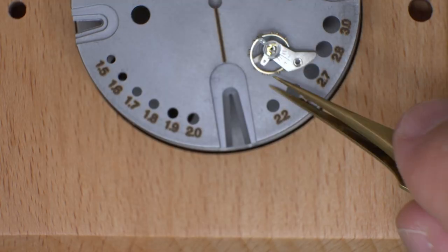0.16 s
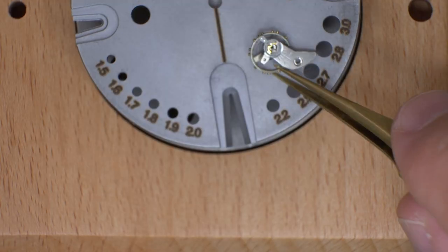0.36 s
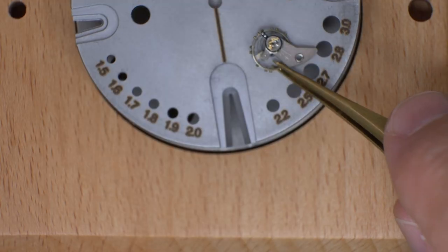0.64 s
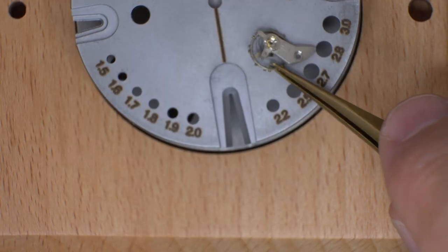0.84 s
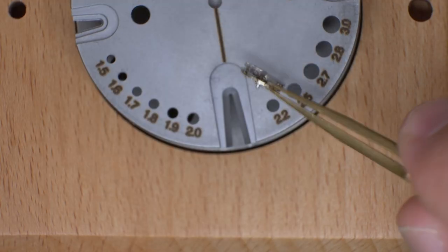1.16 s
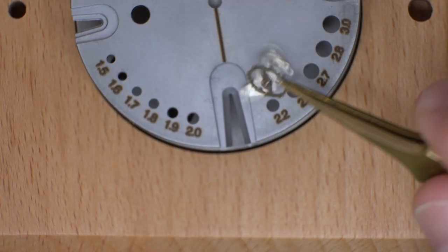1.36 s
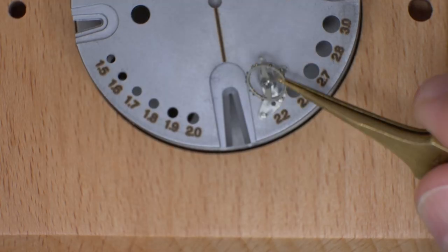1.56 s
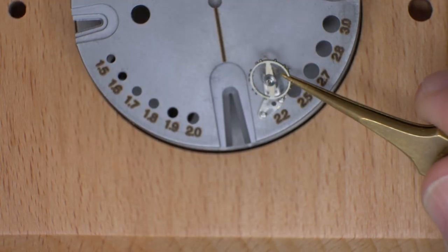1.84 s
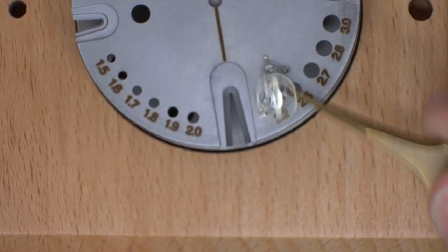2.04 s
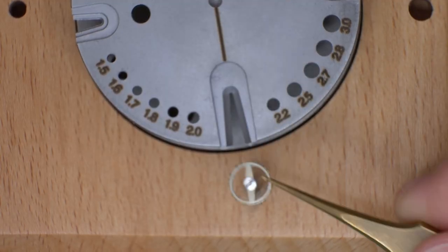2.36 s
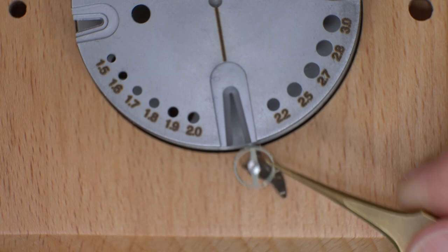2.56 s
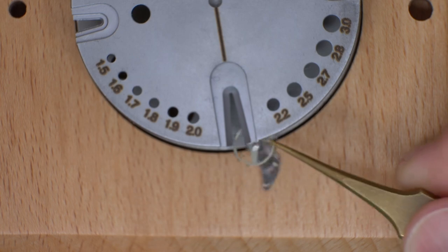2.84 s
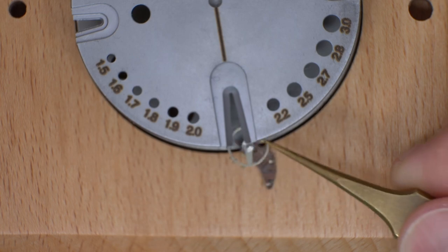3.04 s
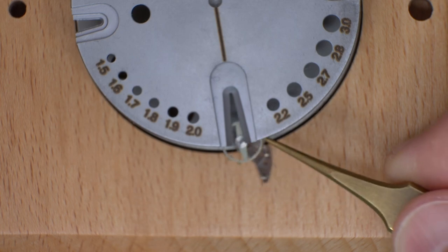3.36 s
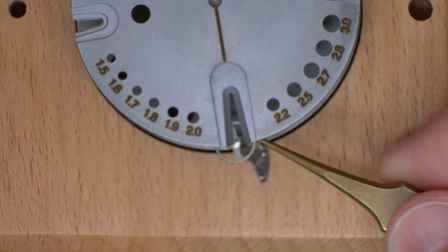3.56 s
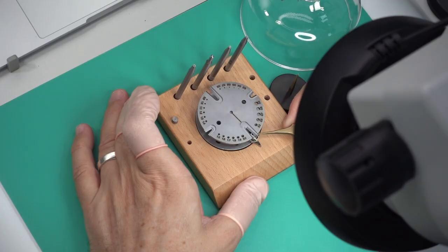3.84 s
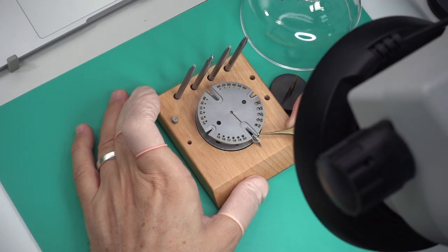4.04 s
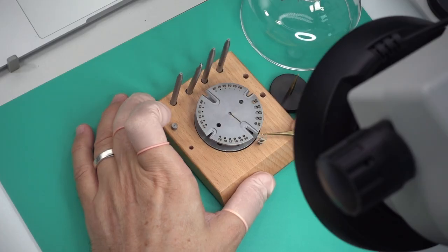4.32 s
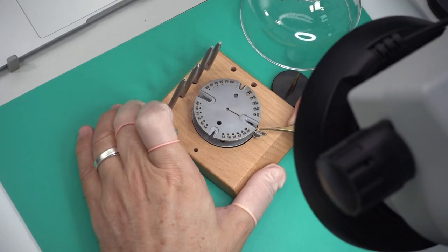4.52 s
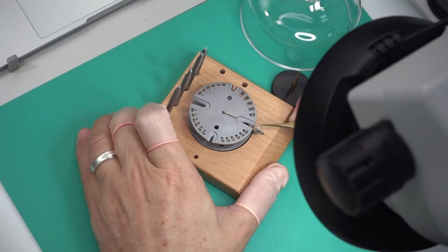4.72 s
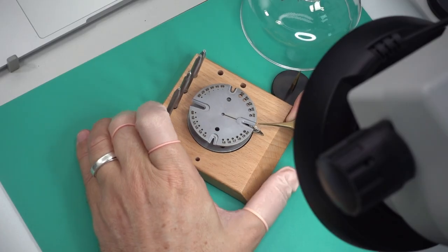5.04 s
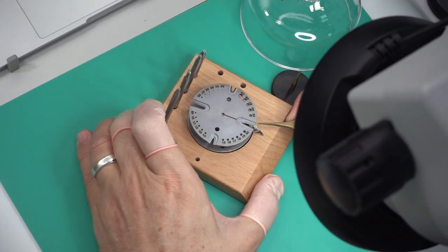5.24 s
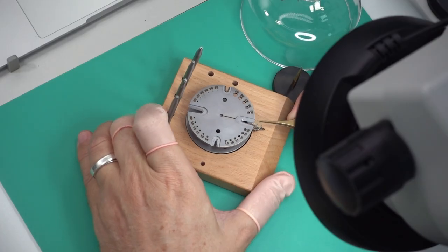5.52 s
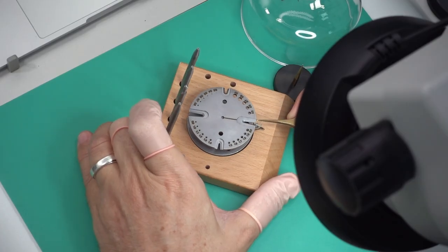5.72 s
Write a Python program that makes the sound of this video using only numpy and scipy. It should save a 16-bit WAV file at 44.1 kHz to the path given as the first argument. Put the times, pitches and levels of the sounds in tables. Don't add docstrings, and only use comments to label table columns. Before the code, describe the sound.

In a quiet workshop, a close microphone picks up low mains hum, ventilation and soft hiss. Tweezers touch a tiny watch part on a steel plate: sparse faint ticks, then a dense burst of bright taps with thin rings and a fluttering rattle. After a pause, a wooden block is turned on a mat, with pins clicking, a scuff, creaks, one sharp crack and a final knock.

```python
import sys
import numpy as np
from scipy import signal
from scipy.fft import rfft, irfft
from scipy.io import wavfile
from scipy.ndimage import uniform_filter1d

SR = 44100
rng = np.random.default_rng(int(sys.argv[2]) if len(sys.argv) > 2 else 0)


def field_ratio(decibels):
    return 10 ** (np.asarray(decibels, dtype=float) / 20)


def wav_out(sig):
    wavfile.write(sys.argv[1], SR, np.round(np.clip(np.atleast_2d(sig).T, -1, 1) * 32767).astype(np.int16))


N = 259308
TURN_S, SET_DOWN_S = 3.5, 5.55

# frequency in Hz, level in dB per Hz.
AIR = [(20, -17), (60, -8.5), (100, -0.5), (230, -3), (275, -10.5), (365, -9), (600, -17), (1000, -19.5),
       (2200, -30.5), (4000, -35), (7800, -34.5), (8500, -32), (9700, -31), (10500, -32), (15800, -30)]
# frequency in Hz, width in Hz, level in dB.
TWEEZERS_MODES = [(3000, 870, 0.5), (4350, 90, -0.5), (5060, 84, 2), (5720, 230, 1.5), (6800, 290, 3.5),
                  (8100, 340, 2.5)]
# frequency in Hz, width in Hz, level in dB.
PIN_MODES = [(1480, 220, 11), (2640, 210, 1), (4290, 1400, 1.1), (4730, 170, 1.1), (7200, 1800, 0.68),
             (11400, 210, 2.6)]
# swell in dB/s, die-away in dB/s, level at rest in dB.
MOVES = [(122, 86, -61.5), (227, 214, -78.5), (194, 167, -82), (200, 211, -90), (600, 350, -110),
         (500, 350, -110)]


def evened(x):
    return x / np.sqrt(np.mean(x ** 2) + 1e-20)


def read(points, hz):
    f, value = np.transpose(points)
    return np.interp(np.log(hz + 1), np.log(f + 1), value)


def add(mix, s, sound):
    part = mix[round(s * SR):][:len(sound)]
    part += sound[:len(part)]


def slow(rate_hz):
    t = np.arange(N // 64 + 2)
    pole = np.exp(-2 * np.pi * rate_hz * 64 / SR)
    x = signal.lfilter([1], [1, -pole], rng.standard_normal(len(t)))
    return np.interp(np.arange(N) / 64, t, evened(uniform_filter1d(x, size=3)))


def coloured(points, x):
    gain = field_ratio(read(points, np.fft.rfftfreq(N, 1 / SR)))
    return evened(irfft(rfft(x) * gain, N))


def humps(modes, hz):
    return 1 + sum(field_ratio(db) ** 2 / (1 + (2 * (hz - f) / width) ** 2) for f, width, db in modes)


def room_tone():
    hum_hz = [39, 120.1, 199, 236, 549, 952.8, 1735, 5690, 12661]
    # level in dB rms, wander in Hz.
    hum_lines = [(-71.5, 2.8), (-53, 0.24), (-63.5, 2.61), (-67.5, 2.99), (-80.5, 2.27), (-79.5, 0.57),
                 (-87, 3), (-90, 1.5), (-93, 0.41)]
    out = field_ratio(-55) * coloured(AIR, rng.standard_normal(N))
    for hz, (db, wander_hz) in zip(hum_hz, hum_lines):
        turns = np.cumsum(hz + wander_hz * slow(2.0)) / SR + rng.random()
        out += np.sqrt(2) * field_ratio(db + 0.5 * slow(0.93)) * np.sin(2 * np.pi * turns)
    return out


def whine():
    whine_hz = [8620, 9050, 9510]
    # pitch scatter in Hz, level in dB rms, tone length in s, loss between frames in dB.
    whine_tones = [(61, -78.5, 0.037, 1), (75, -76, 0.024, 17), (109, -76.5, 0.0077, 1)]
    frame_s, first_s = 0.04, 0.024
    starts = np.arange(first_s, N / SR, frame_s / 2)
    out = np.zeros(N)
    for hz, (scatter_hz, db, length, loss_db) in zip(whine_hz, whine_tones):
        layer = np.zeros(N + SR)
        t = np.arange(-2 * length, 2 * length, 1 / SR)
        chances = rng.standard_normal((len(starts), 4))
        for k, (s, (pitch, size, slide, brevity)) in enumerate(zip(starts, chances)):
            turns = (hz + scatter_hz * pitch) * t
            turns += scatter_hz * slide * t ** 2 / length / 2
            swell = np.exp(-(1.9 * field_ratio(4.1 * brevity) * t / length) ** 2)
            blip = swell * np.sin(2 * np.pi * turns + 3 * slide)
            blip_db = 2.8 * np.clip(size, -3, 1) - loss_db * (k % 2)
            add(layer, 0.5 + s + 0.003 * slide - 2 * length, field_ratio(blip_db) * blip)
        ragged = (1 + 0.9 * slow(300)) / 1.25
        out += field_ratio(db) * ragged * evened(layer[SR // 2:][:N])
    return field_ratio(0.99 * slow(4.8)) * out


def movement(strokes, swell, fade, rest_db):
    t = np.arange(0, N + 64, 64) / SR
    power = field_ratio(rest_db) ** 2
    for s, hold, db in strokes:
        early = np.maximum(s - hold / 2 - t, 0)
        late = np.maximum(t - s - hold / 2, 0)
        power = power + field_ratio(db - swell * early - fade * late) ** 2
    return np.interp(np.arange(N) / SR, t, np.sqrt(power))


def slips(grain_db):
    return field_ratio(grain_db * slow(120)) * rng.standard_normal(N)


def hand_leans():
    # frequency in Hz, level in dB per Hz.
    bump = [(20, -23), (38, -2.5), (60, 1), (100, -5.5), (160, -6.5), (300, -50.5)]
    # middle in seconds, hold in seconds, level in dB.
    leans = [
        (2.03, .04, -52),
        (2.11, 0.025, -49.5),
        (2.306, 0.13, -57),
        (2.61, 0.21, -48.5),
        (3.014, 0.033, -53.5),
        (3.51, 0.066, -59),
        (4.174, .1, -54.5),
        (4.263, 0.05, -46.5),
        (5.456, 0.059, -53.5),
    ]
    return movement(leans, *MOVES[0]) * coloured(bump, rng.standard_normal(N))


def mat_and_wood():
    # frequency in Hz, level in dB per Hz.
    mat = [(150, -1.5), (300, 9.5), (500, 4.5), (900, -3), (1500, -19.5)]
    # frequency in Hz, level in dB per Hz.
    wood = [(700, -6.5), (1100, -8.5), (1400, -4.5), (1800, -2), (2400, -10), (4000, -22.5)]
    # middle in seconds, hold in seconds, level in dB.
    drags = [(1.67, .08, -72), (2.14, 0.045, -66.5), (2.27, .03, -66), (2.4, 0.02, -58), (2.76, 0.081, -59),
             (2.96, 0.054, -66), (3.85, .02, -62), (4.07, 0.024, -64), (4.16, 0.022, -57.5),
             (4.236, 0.015, -47.5), (4.46, 0.17, -58.5), (4.68, 0.039, -54.5), (4.89, .02, -63),
             (5.425, 0.029, -54), (5.57, 0.026, -53), (5.68, 0.018, -59.5)]
    # middle in seconds, hold in seconds, level in dB.
    rubs = [(.27, .03, -73), (1.6, .08, -77), (2.09, 0.24, -70), (2.27, .04, -68), (2.4, .04, -68),
            (2.53, .08, -73), (2.74, .05, -68.5), (2.98, 0.034, -74), (4.07, 0.031, -70),
            (4.245, 0.033, -67), (4.42, 0.03, -67), (4.5, 0.2, -65.5), (4.71, 0.034, -68), (5.13, .03, -73),
            (5.43, 0.066, -63.5), (5.572, 0.031, -63.5), (5.7, 0.055, -71)]
    on_mat = movement(drags, *MOVES[1]) * coloured(mat, slips(5.2))
    return on_mat + movement(rubs, *MOVES[2]) * coloured(wood, slips(1.7))


def metal_scrapes():
    # frequency in Hz, level in dB per Hz.
    steel = [(1800, -20.5), (2800, -1), (4500, -0.5), (7000, -5.5), (10000, 2), (16000, -25)]
    # middle in seconds, hold in seconds, level in dB.
    scrapes = [(.27, .03, -74), (1.42, 0.045, -69), (1.59, 0.077, -74), (2.01, .03, -71),
               (2.12, 0.056, -72), (2.2, 0.047, -61.5), (2.28, .04, -70), (2.52, 0.036, -79),
               (2.98, 0.028, -70), (4.1, 0.06, -73), (4.22, 0.047, -69), (4.27, .03, -76),
               (4.5, 0.21, -68.5), (4.7, 0.033, -70), (4.89, .03, -71), (5.13, 0.033, -66.5),
               (5.27, 0.087, -70.5), (5.36, 0.051, -67.5), (5.59, 0.067, -69), (5.68, 0.021, -65.5)]
    catches = 4.5 * rng.standard_normal(N) * (rng.random(N) < 250 / SR)
    f = np.fft.rfftfreq(N, 1 / SR)
    spectrum = rfft(slips(2.8) + catches)
    tips = coloured(steel, irfft(spectrum * humps(TWEEZERS_MODES, f), N))
    pins = coloured(steel, irfft(spectrum * humps(PIN_MODES, f), N))
    return movement(scrapes, *MOVES[3]) * np.where(np.arange(N) < TURN_S * SR, tips, pins)


def grit_and_song():
    # frequency in Hz, level in dB per Hz.
    grit = [(300, 7), (800, -6.5), (2000, -2), (3500, -11), (5000, -7), (7500, -13), (12000, -17),
            (16000, -27)]
    # middle in seconds, hold in seconds, level in dB.
    grinds = [
        (4.185, .016, -61),
        (4.245, 0.041, -55),
        (5.4, .021, -62),
        (5.577, 0.035, -65.5),
    ]
    # frequency in Hz, width in Hz, level in dB.
    part_modes = [(4980, 25, 36), (5400, 260, 25), (5700, 160, 24), (3100, 400, 21)]
    # middle in seconds, hold in seconds, level in dB.
    shimmers = [
        (1.42, .06, -80),
        (1.495, .01, -73),
        (1.53, .045, -68.5),
        (1.565, 0.017, -66),
        (1.6, .03, -75),
        (1.63, .03, -73),
        (2.198, .05, -66),
    ]
    fine = slips(1.7)
    resonance = np.sqrt(humps(part_modes, np.fft.rfftfreq(N, 1 / SR)) - 1)
    song = evened(irfft(rfft(fine) * resonance, N))
    return movement(grinds, *MOVES[4]) * coloured(grit, fine) + movement(shimmers, *MOVES[5]) * song


def struck(out_len, hz, db, t60, rise):
    t = np.arange(out_len) / SR
    envelope = field_ratio(db - 60 * t / max(t60, 0.005)) * np.minimum(t / rise, 1)
    return np.sqrt(2) * envelope * np.sin(2 * np.pi * hz * t)


def short_modes(rows):
    out = np.zeros(N)
    for s, db, hz, t60 in rows:
        add(out, s, struck(round(max(t60, 0.005) * SR), hz, db, t60, 0.3 / hz))
    return out


def wood_knocks_and_creaks():
    # start in seconds, level in dB, pitch in Hz, t60 in seconds.
    knocks = [(2.765, -55.5, 483, 0.14), (3.83, -54, 490, .1), (4.224, -32, 117, 0.056),
              (4.231, -44, 330, .06), (4.236, -49, 553, .05), (4.258, -46, 457, 0.031),
              (4.414, -51, 934, 0.051), (4.652, -50.5, 488, .16), (5.558, -47, 770, .05),
              (5.559, -51, 530, .019), (5.5616, -30.5, 314, 0.033), (6.1, -41.5, 155, .14),
              (6.1, -52, 440, .08)]
    # start in seconds, level in dB, pitch in Hz.
    creaks = [(4.368, -51.5, 1480), (4.379, -60, 1500), (4.398, -60, 1700), (4.414, -54, 1480),
              (4.4225, -55, 1720), (4.427, -56, 1340), (4.44, -62, 2300), (4.462, -60, 1700),
              (4.495, -50, 1550), (4.517, -57, 1450), (5.391, -59, 1840), (5.398, -56, 1600),
              (5.405, -57, 1800), (5.428, -50, 1390), (5.441, -51, 1390), (5.46, -53, 1390),
              (5.472, -61, 1450), (5.487, -53, 1600), (5.505, -57, 1540), (2.081, -54, 1750),
              (2.42, -56, 1870)]
    creak_t60 = 0.022
    return short_modes([*knocks, *[(*row, creak_t60) for row in creaks]])


def bright_notes():
    # start in seconds, level in dB,
    # pitch in Hz, t60 in seconds.
    pinglets = [(.2355, -56, 3150, .022), (.2355, -60, 5150, .035), (1.2835, -60, 3200, .012),
                (1.508, -54, 3250, .012), (1.556, -57, 3200, .012), (1.558, -58, 5600, .04),
                (2.216, -50, 3150, .014), (2.957, -58, 3300, .012), (4.1768, -49, 2800, .012),
                (4.1777, -42, 1780, .017), (4.232, -55, 2200, .025), (4.247, -54, 2100, .02),
                (5.048, -57, 4850, .02), (5.558, -48, 1760, .035), (5.5585, -47, 3000, .02),
                (5.561, -47, 4050, .025), (5.561, -47, 6400, .02), (5.5626, -48, 8950, .02),
                (5.5604, -43, 5380, .028),
        (5.562, -43, 5500, .04),
    ]
    return short_modes(pinglets)


def plate_rings():
    plate_hz = [9917, 6615, 13560]
    plate_t60 = [0.46, 0.23, 0.1]
    # start in seconds, upper plate mode in dB, lower plate mode in dB.
    rings = [(.9, -75, -95), (1.282, -67, -73), (1.39, -86, -76), (1.411, -90, -73), (1.44, -73, -69),
             (1.505, -61.5, -62), (1.563, -75, -64), (1.612, -74, -91), (2.183, -56.5, -62),
             (2.215, -50.5, -56), (2.256, -73, -72), (4.22, -58.5, -68)]
    # start in seconds, level in dB.
    pings = [
        (1.405, -65),
        (1.506, -60),
        (1.555, -69),
        (2.215, -70),
        (2.372, -59),
        (2.402, -64),
        (4.222, -74),
    ]
    rise_s = 0.0017
    out = np.zeros(N)
    for s, upper_db, lower_db in rings:
        for hz, t60, db in zip(plate_hz, plate_t60, (upper_db, lower_db)):
            add(out, s, struck(SR // 2, hz, db, t60, rise_s))
    for s, db in pings:
        add(out, s, struck(SR // 2, plate_hz[-1], db, plate_t60[-1], rise_s))
    return out * field_ratio(1.2 * slow(60))


def tick(s, db, hz, spread, tail_db, edge_db, noise):
    t = np.arange(1024) / SR
    f = np.abs(np.fft.fftfreq(1024, 1 / SR)) + 50
    octaves = np.log2(f / hz)
    hump = np.exp(-0.9 * (octaves / np.clip(spread, 0.15, 3)) ** 2) / (1 + (f / 11000) ** 6)
    hump += 0.12 / (1 + (f / hz) ** 6) * (f > 900)
    hump *= humps(PIN_MODES if TURN_S < s < SET_DOWN_S else TWEEZERS_MODES, f)
    edge = np.exp(-(np.log2(f / 12500) / 0.37) ** 2)
    power = hump / hump.sum() + field_ratio(edge_db) ** 2 * edge / edge.sum()
    gain = np.log(power + 1e-7) / 2
    ring = np.fft.ifft(np.exp(gain - 1j * signal.hilbert(gain).imag)).real[:400]
    hit = noise * field_ratio(-60 * t / 0.02) * np.minimum(t / 0.00046, 1)
    hit *= field_ratio(tail_db + 1.0) / np.linalg.norm(hit)
    hit[:40] += 0.45 * noise[-40:] * field_ratio(-60 * t[:40] / 0.0015)
    hit[0] = 1.0
    hit[round(0.00044 * SR)] += 0.24
    return field_ratio(db + 26.0) * signal.fftconvolve(hit, ring)


def ticks():
    # start in seconds, blow in dB, centre in Hz, spread in octaves.
    taps = [(0.3135, -39.5, 2900, .5), (0.807, -48, 3100, 0.24), (0.8074, -36, 12000, 0.44),
            (1.507, -29, 3500, .9), (1.532, -44, 4000, 1.2), (1.614, -39, 3490, .76), (2.02, -42, 5000, .7),
            (2.085, -32, 2420, 0.6), (2.133, -38, 4160, .56), (2.158, -32, 4120, 0.98),
            (2.1848, -29, 4400, 0.95), (2.239, -38, 4530, .86), (2.2532, -36, 4300, .4),
            (2.258, -23, 6900, 0.45), (2.26, -40, 3000, 0.63), (2.2679, -22.5, 6000, 0.63),
            (2.274, -36, 4400, 0.91), (2.2956, -30.5, 4730, 0.28), (2.338, -33, 4450, .77),
            (2.352, -44, 1820, .9), (2.372, -25, 5840, 0.9), (2.38, -36, 4020, .65),
            (2.3873, -35, 3700, 0.47), (2.403, -30.5, 5670, 0.44), (2.4265, -28, 6200, 0.69),
            (2.4968, -38, 4320, .4), (2.5, -28.5, 7300, 0.53), (2.871, -37.5, 3650, 0.97),
            (2.983, -39, 4640, .45)]
    # start in seconds, blow in dB, centre in Hz.
    swings = [(2.512, -39, 6630), (2.5155, -38, 4740), (2.5457, -35.5, 5560), (2.5684, -36, 6370),
              (2.5753, -42, 5260), (2.592, -35, 6070), (2.607, -35.5, 5000), (2.619, -36, 6010),
              (2.632, -37, 4830), (2.657, -33, 4500), (2.6858, -39, 4290), (2.689, -35.5, 5530),
              (2.7026, -34, 4320), (2.7164, -40.5, 3200), (2.723, -35, 5850), (2.7327, -39, 4250),
              (2.7432, -38, 3850), (2.755, -37.5, 6630), (2.779, -37, 4320), (2.922, -49, 4600)]
    # start in seconds, blow in dB, centre in Hz, spread in octaves.
    pin_ticks = [(4.055, -32, 3300, 0.95), (4.091, -34, 4320, 0.87), (4.108, -33, 3490, 0.98),
                 (4.114, -37.5, 2270, 1), (4.126, -34.5, 2590, 1.8), (4.2086, -34, 3280, 0.8),
                 (4.219, -31, 4000, 1.2), (4.2546, -33, 4500, 0.67), (4.2851, -33, 3900, 0.18),
                 (4.2853, -31, 5800, 0.34), (4.431, -28, 4570, 0.36), (4.432, -40, 6800, 0.27),
                 (4.4747, -40, 4590, .82), (4.396, -34, 2300, 0.55), (4.4995, -38, 5000, 0.32),
                 (4.4982, -27, 11000, .6), (4.5256, -41.5, 6230, .59), (4.9653, -40.5, 4000, .53),
                 (5.011, -45, 4200, 0.27), (5.035, -46, 3600, .4), (5.099, -42, 6030, 0.78),
                 (5.117, -31, 7000, 0.4), (5.3225, -37, 4300, 0.3), (5.329, -38, 4200, .3),
                 (5.3355, -37.5, 4140, .3), (5.376, -36, 4000, .3), (5.348, -37, 3880, 0.26),
                 (5.4963, -37, 4300, .3), (5.5047, -42, 3800, 0.3), (5.5244, -32, 4400, .3)]
    # start in seconds, blow in dB, centre in Hz, spread in octaves.
    rattles = [(0.235, -47, 4300, 1), (1.2828, -38, 4040, 1.1), (1.5553, -33, 4200, 0.99),
               (2.01, -37, 2050, 0.99), (2.0805, -37.5, 2880, 0.81), (2.213, -35, 9000, 0.98),
               (2.215, -26.5, 5260, 1.2), (2.216, -38.5, 3050, .4), (2.4178, -37, 1910, 0.49),
               (2.8405, -45, 4350, 0.79), (2.956, -35.5, 4100, 1), (4.0675, -40, 3540, 0.75),
               (4.0733, -34, 5670, 0.49), (4.178, -32, 4500, 0.77), (4.2222, -26, 7340, 0.27),
               (4.2263, -32, 5000, 0.28), (4.228, -28.5, 2890, 0.64), (4.2618, -30.5, 4500, 0.33),
               (4.367, -37, 3000, 1), (4.3923, -40, 5170, .74), (4.87, -33.5, 3330, 0.76),
               (4.8814, -37, 2380, 1), (4.8995, -35, 4240, 0.25), (5.3628, -50, 4040, .55),
               (5.486, -31.5, 4300, .5), (5.558, -27.5, 3000, 1.15), (5.5616, -24, 5060, 0.9)]
    # start in seconds, blow in dB, centre in Hz, spread in octaves.
    cracks = [
        (4.688, -19.5, 3300, 1.3),
        (4.6893, -28.5, 6140, .3),
        (4.691, -25.5, 2220, 0.45),
    ]
    # rattle tail in dB, sharp edge above 10 kHz in dB.
    contact = [(-4.5, -14), (-4, -10), (-5.5, -8), (2, -10.5), (-3, -8)]
    scatter_db, swing_spread = 1.5, 0.43
    swings = [(*row, swing_spread) for row in swings]
    out = np.zeros(N)
    for rows, (tail_db, edge_db) in zip((taps, swings, pin_ticks, rattles, cracks), contact):
        for row in rows:
            noise = rng.standard_normal(1024)
            tail_chance, edge_chance = scatter_db * rng.standard_normal(2)
            add(out, row[0], tick(*row, tail_db + tail_chance, edge_db + edge_chance, noise))
    return out


def scene():
    hits = ticks()
    t = np.arange(SR // 4) / SR
    echo = rng.standard_normal(SR // 4) * field_ratio(-60 * t / 0.27)
    hits = hits + field_ratio(-8.5) * signal.fftconvolve(hits, echo / np.linalg.norm(echo))[:N]
    struck_things = hits + plate_rings() + bright_notes() + wood_knocks_and_creaks()
    rubbing = hand_leans() + mat_and_wood() + metal_scrapes() + grit_and_song()
    mid = struck_things + rubbing + room_tone() + whine()
    side = field_ratio(-30) * np.roll(hits, 2) + field_ratio(-87) * coloured(AIR, rng.standard_normal(N))
    return np.array([mid + side, mid - side])


def roll_off(x):
    return signal.sosfilt(signal.butter(12, 16460, fs=SR, output="sos"), x)


def record(dry):
    band_limit = signal.firwin(511, 15780, window=("kaiser", 9), fs=SR)
    mix = signal.oaconvolve(dry, band_limit[None], "same")
    return roll_off(mix)


dry = scene()
out = record(dry)
wav_out(out)
```